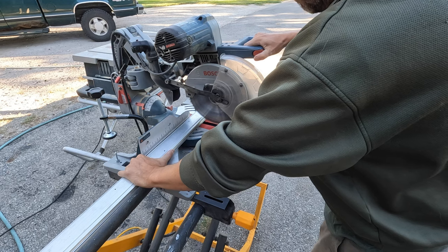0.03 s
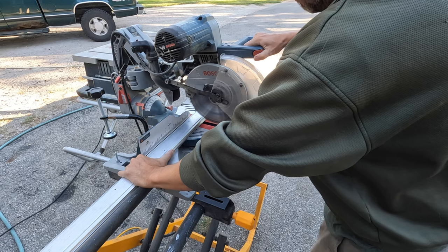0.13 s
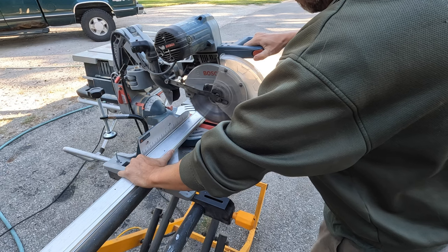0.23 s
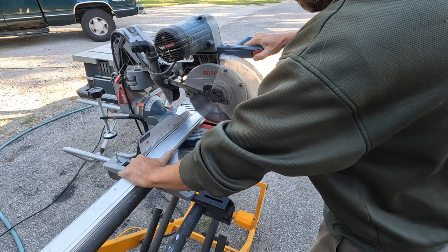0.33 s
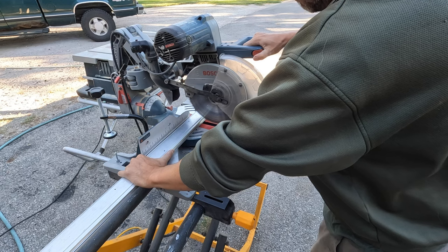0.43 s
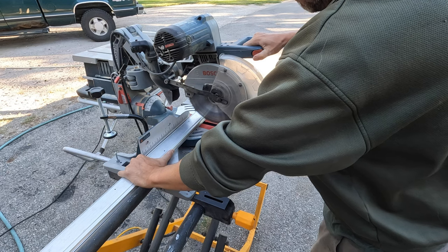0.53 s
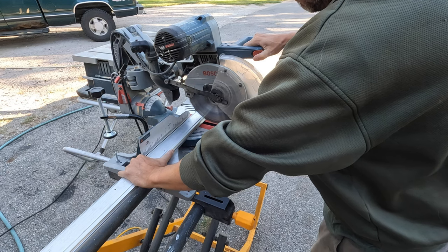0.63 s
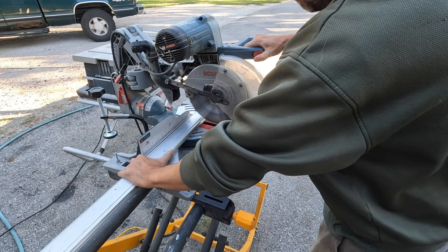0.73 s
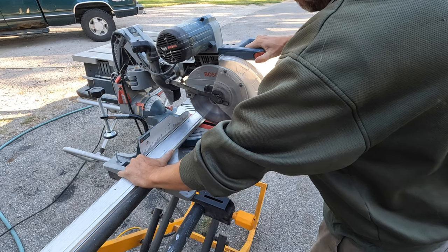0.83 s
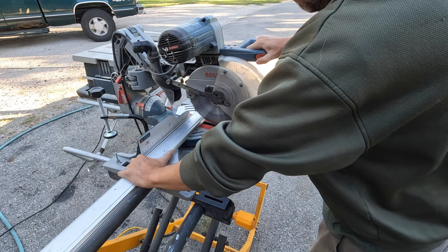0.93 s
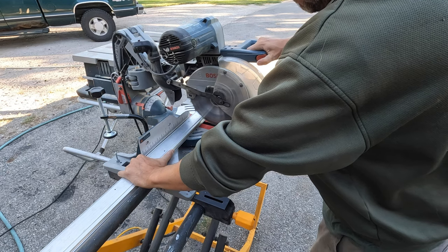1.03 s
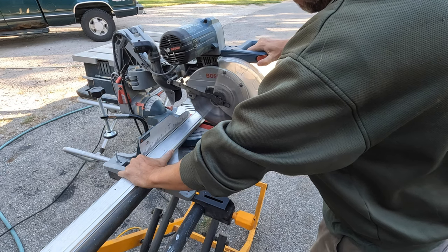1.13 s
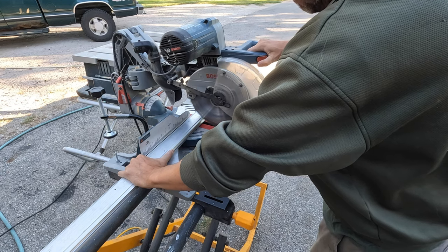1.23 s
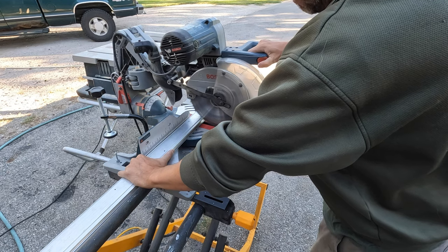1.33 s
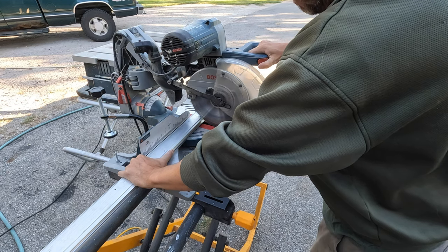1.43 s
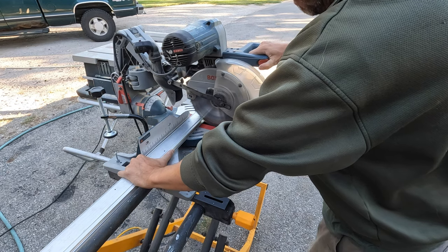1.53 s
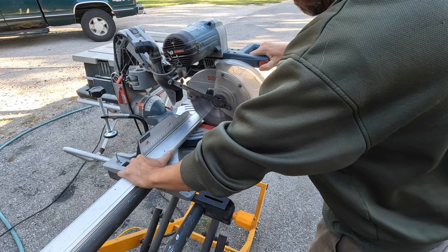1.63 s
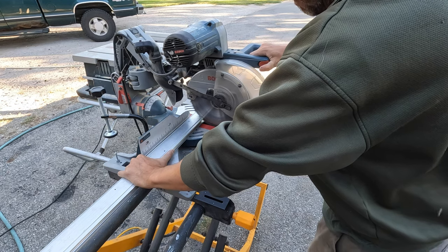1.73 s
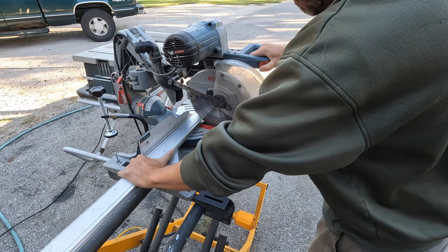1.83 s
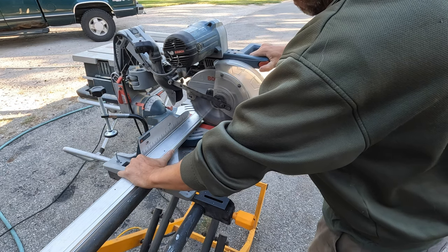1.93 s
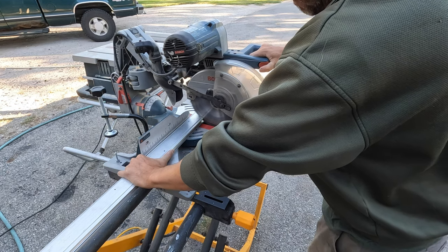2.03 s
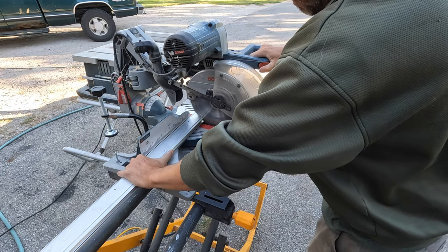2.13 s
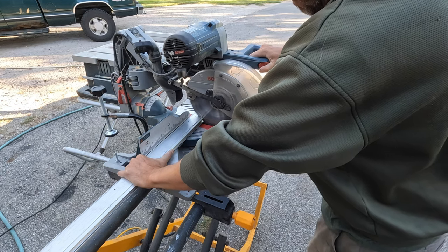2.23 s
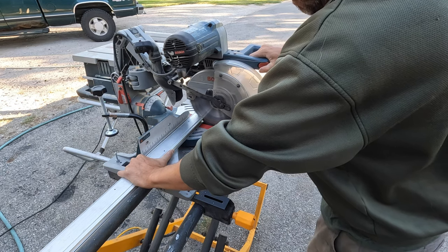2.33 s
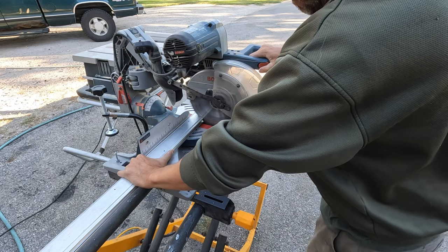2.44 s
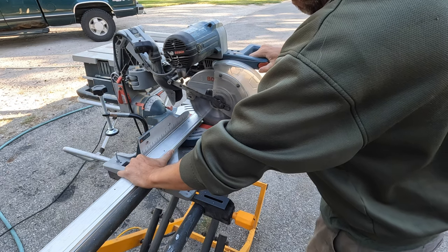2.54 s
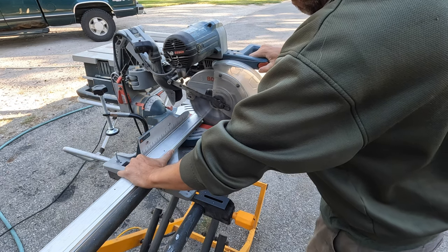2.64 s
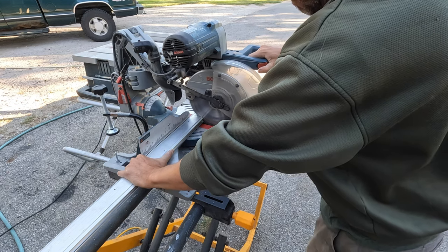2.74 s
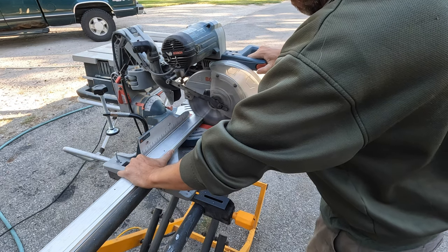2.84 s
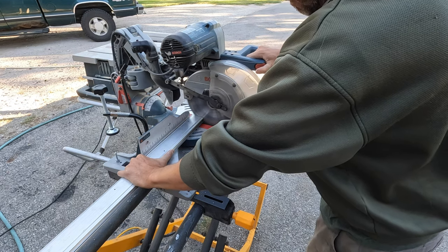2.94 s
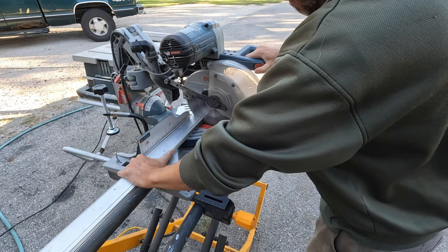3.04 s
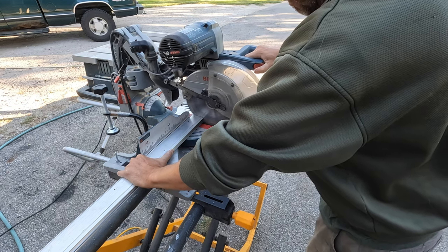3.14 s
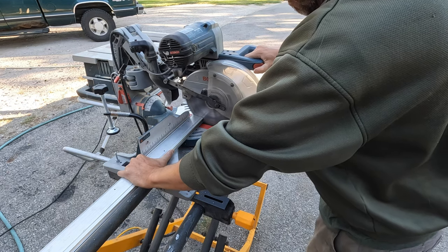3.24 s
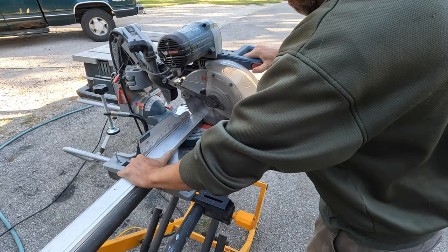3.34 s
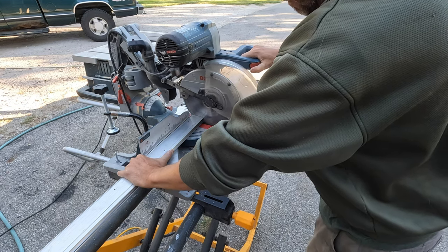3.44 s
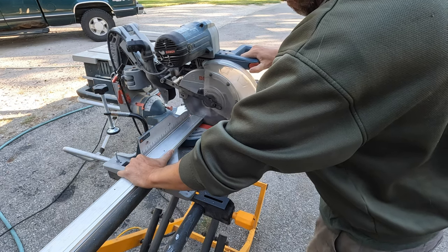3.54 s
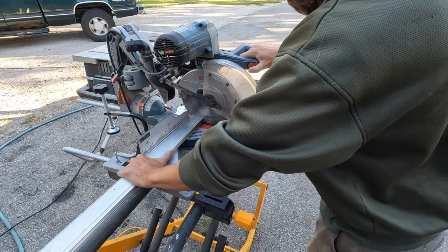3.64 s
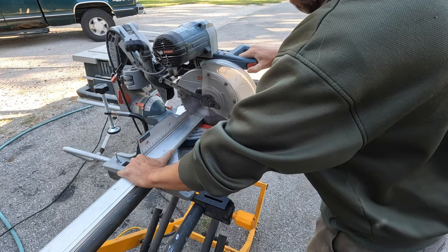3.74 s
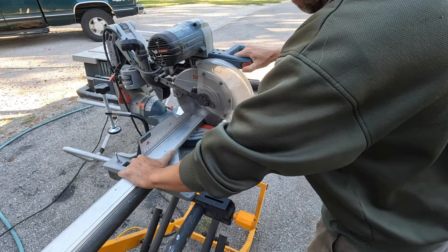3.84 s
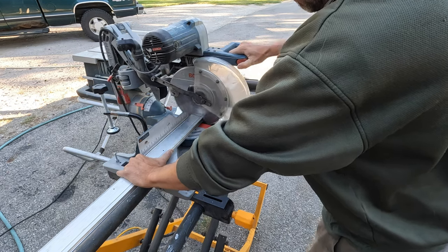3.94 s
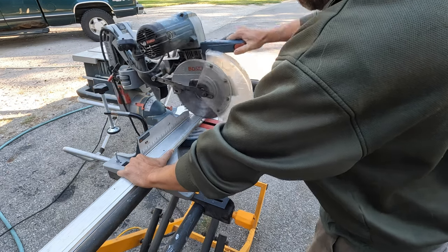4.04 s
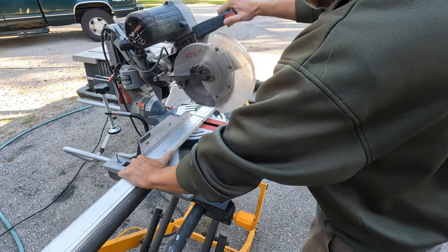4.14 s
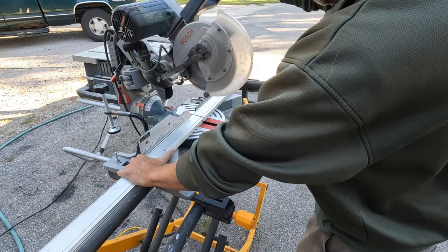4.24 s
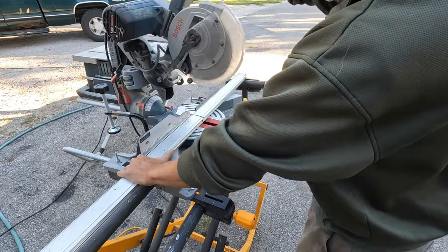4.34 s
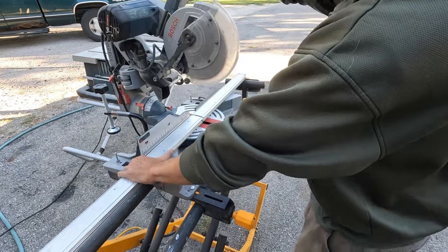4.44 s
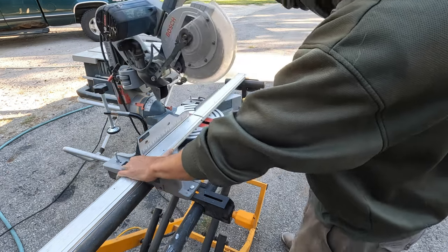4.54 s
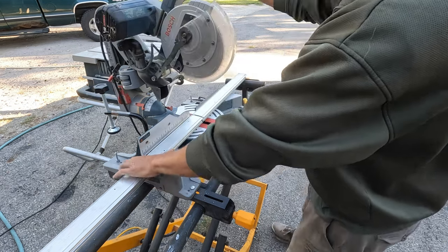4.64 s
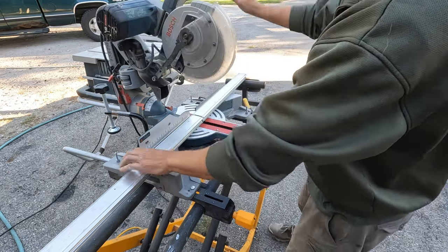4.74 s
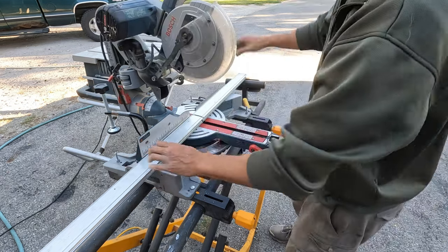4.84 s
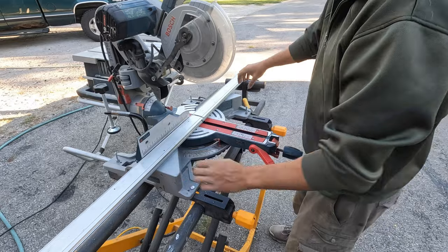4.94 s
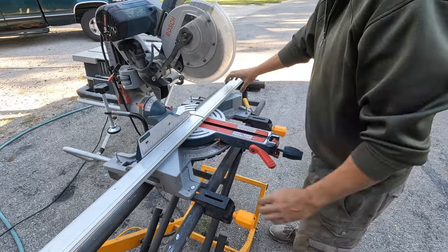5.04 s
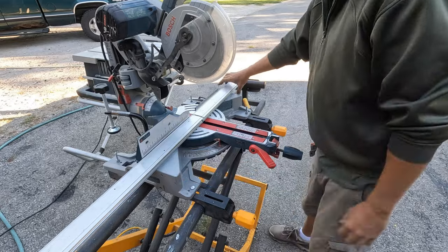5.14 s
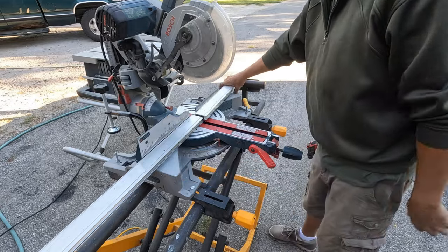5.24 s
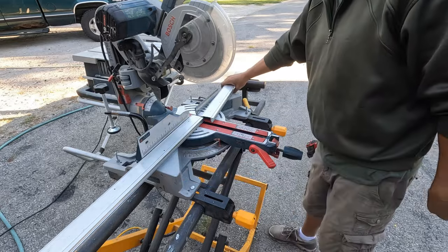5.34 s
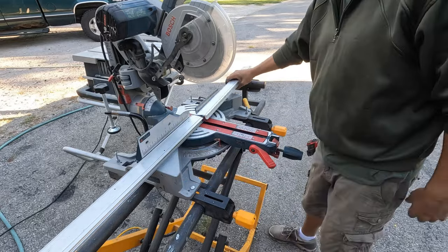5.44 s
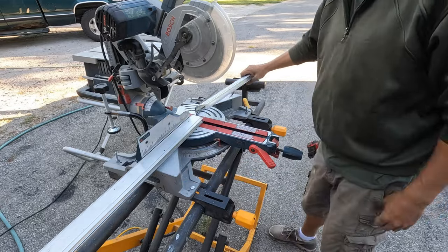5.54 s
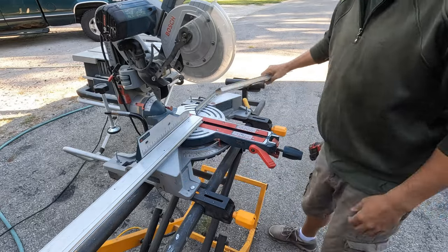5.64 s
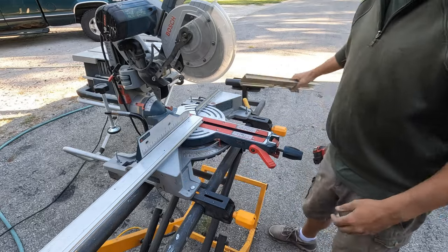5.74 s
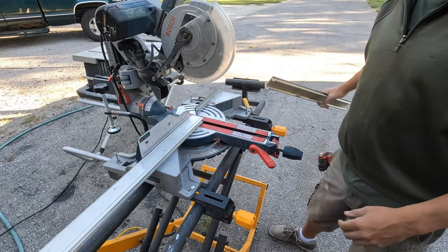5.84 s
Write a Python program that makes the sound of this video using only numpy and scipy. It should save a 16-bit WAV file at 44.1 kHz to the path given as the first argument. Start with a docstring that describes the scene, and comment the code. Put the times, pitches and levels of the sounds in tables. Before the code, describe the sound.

Harsh metallic sawing with shifting squeals stops abruptly, followed by a spinning blade whirring and whistling downward, and light knocks of an aluminium offcut.

```python
"""Mitre saw cutting aluminium

A saw cuts through an extrusion on a driveway: forced vibration makes the teeth hammer and whine, chips hiss,
and the tooth rate sags with the motor. The blade breaks through, is lifted and braked: narrow noise bands
whistle downwards in pitch while the modes of the steel disc sing on. The offcut, noise bursts exciting
resonances, clatters as it is picked up. Light breeze and puffs of air move the microphone.
A hard surface close by returns one echo, whose interference gives the noises a hollow colour."""
import sys
import numpy as np
from scipy import signal
from scipy.fft import rfft, irfft, next_fast_len
from scipy.io import wavfile

SR = 44100
rng = np.random.default_rng(int(sys.argv[2]) if len(sys.argv) > 2 else 0)


def inscribe(sig):
    """Save sig as 16-bit PCM at rate SR to the path in sys.argv[1].

    A 1-D sig is mono; a 2-D sig holds one channel per row.
    Samples are clipped to [-1, 1] before scaling.
    """
    pcm = np.round(np.clip(np.atleast_2d(sig).T, -1, 1) * 32767)
    wavfile.write(sys.argv[1], SR, pcm.astype(np.int16))


N = 259749
TIME = np.arange(N) / SR   # s
TOOTH_COUNT = 60


def from_db(db):
    """Logarithmic level: decibels to amplitude gain."""
    return 10 ** (np.asarray(db) / 20)


def rms_one(x):
    """Normalisation of mean power: scale to an rms of 1."""
    return x / np.sqrt(np.mean(x ** 2) + 1e-20)


def in_time(rows):
    """Linear interpolation: the columns of a curve table at every sample."""
    s, *columns = np.transpose(rows)
    return [np.interp(TIME, s, c) for c in columns]


def colour(x, points):
    """Spectral shaping: filter by an (f/Hz, gain/dB) outline, falling 20 dB per octave beyond its ends."""
    size = next_fast_len(N + 8192)
    hz, db = np.transpose(points)
    bins = np.maximum(np.arange(size // 2 + 1) * SR / size, 1)
    outline = np.interp(np.log(bins), np.log(hz), db)
    octaves_below = np.maximum(np.log2(hz[0] / bins), 0)
    octaves_above = np.maximum(np.log2(bins / hz[-1]), 0)
    gain = from_db(outline - 20 * (octaves_below + octaves_above))
    return irfft(rfft(x, size) * gain, size)[:N]


def drift(rate):
    """Low-pass random process: slow chance of rms 1, from two equal poles at rate Hz."""
    r = np.exp(-80 * np.pi * rate / SR)   # the process runs at SR / 40
    chance = rng.standard_normal(N // 40 + 2002)
    slow = signal.lfilter([1], [1, -2 * r, r * r], chance)[2000:]   # skip the settling
    return np.interp(np.arange(N) / 40, np.arange(len(slow)), rms_one(slow))


def noise(points):
    """Coloured Gaussian noise of rms 1."""
    return rms_one(colour(rng.standard_normal(N), points))


def resonance(x, hz, width):
    """Damped oscillator: a two-pole resonance with a gain of about 1 at its peak."""
    r = np.exp(-np.pi * width / SR)
    zeros = np.array([1, 0, -1]) * (1 - r * r) / 2
    poles = [1, -2 * r * np.cos(2 * np.pi * hz / SR), r * r]
    return signal.lfilter(zeros, poles, x + 1e-18)


def phase_of(hz):
    """Phase integration: running phase of a moving frequency."""
    return 2 * np.pi * np.cumsum(hz) / SR


def narrow_noise(hz, width):
    """Quadrature modulation: noise gathered around a moving pitch, rms about 0.71 (-3 dB)."""
    phase = phase_of(hz)
    return (drift(width) * np.cos(phase) + drift(width) * np.sin(phase)) / np.sqrt(2)


def swell(start, length, rise_s=0.023, fall_s=0.017):
    """Smooth envelope: a rise, hold and fall between 0 and 1."""
    rise = .5 + .5 * np.tanh((TIME - start) / (2 * rise_s))
    fall = .5 - .5 * np.tanh((TIME - start - length) / (2 * fall_s))
    return rise * fall


ECHO_DELAY_S = .003775


def near_echo(x, strength, dull_hz=9000):
    """Comb-filter interference: one reflection, weak in the top treble, hollows the spectrum."""
    size = next_fast_len(N + 8192)
    hz = np.arange(size // 2 + 1) * SR / size
    # 77% of the strength returns in the bass, 20% at the very top
    back = np.clip(strength, 0, .95) * (0.2 + 0.57 / (1 + (hz / dull_hz) ** 10))
    comb = (1 + back * np.exp(-2j * np.pi * hz * ECHO_DELAY_S)) / np.sqrt(1 + back ** 2)
    return irfft(rfft(x, size) * comb, size)[:N]


BREAK_S, BREAK_DB_PER_S = 3.718, 212   # the blade breaks through and the cut dies away
USUAL_LOAD_DB = -32.5
# how hard the teeth hammer the extrusion: t/s, load level/dB
CUTTING_LOAD = [(0.0, -33), (0.14, -29), (0.83, -31), (1.13, -36.5), (1.37, -36), (1.54, -41), (1.75, -34),
                (2.07, -38.5), (2.34, -32), (2.68, -32), (2.74, -37.5), (3.17, -31), (3.5, -36.5),
                (3.6, -31.5), (3.7, -33)]


def under_load(db, share):
    """Forcing sets response: a layer's gain follows a share of the load's swing and dies at the break."""
    load_db, = in_time(CUTTING_LOAD)
    broken_s = np.maximum(TIME - BREAK_S, 0)
    return from_db(db + share * (load_db - USUAL_LOAD_DB) - BREAK_DB_PER_S * broken_s)


def tooth_bites(rate, memory):
    """Near-periodic forcing: unlike teeth partly repeat each turn; the pattern changes as the kerf deepens."""
    turns = np.cumsum(rate / TOOTH_COUNT) / SR
    steps, orders = 32 * TOOTH_COUNT, 5 * TOOTH_COUNT   # per turn: points, harmonics
    fresh = rng.standard_normal((int(turns[-1]) + 2, orders, 2)) @ [1, 1j]
    strengths = signal.lfilter([1], [1, -memory], fresh, axis=0)   # each turn remembers the last
    pattern = irfft(strengths, steps, axis=1).ravel()
    wobble = 1 + 0.041 * np.sin(2 * np.pi * turns + drift(1.0))   # the blade runs slightly out of true
    return wobble * rms_one(np.interp(turns * steps, np.arange(len(pattern)), pattern))


# layers of the cut: (level at the usual load/dB, share of the load's swing that is followed)
RASP_LEVEL, WALLS_LEVEL, CHIPS_LEVEL = (-32, 0.68), (-34, 0.98), (-33, -0.1)
# spectral outlines of kerf, extrusion walls, flying chips and table: f/Hz, relative level/dB
RASP_COLOUR = [(2700, -55), (3400, 3), (3900, 6), (4500, 6), (5200, 5.5), (5800, 3), (6400, -1.5),
               (7200, -9), (8200, -12), (9500, -39)]
WALLS_COLOUR = [(330, -11), (500, -7), (680, -9), (850, 1.5), (1050, 3), (1350, 0.5), (1600, 1.5),
                (1900, -1.5), (2400, 0), (3200, 1.5), (4200, -6.5)]
CHIPS_COLOUR = [(6500, 2), (8600, 0.5), (10000, -2), (11700, 1), (13000, 0), (15000, 1.5), (16500, -6)]
RUMBLE_COLOUR = [(20, 1), (38, -13), (65, 10), (100, -3.5), (150, 0), (230, -0.5), (310, -3), (450, -8),
                 (700, -6)]
# rumble of the table: t/s, relative level/dB
TABLE_RUMBLE = [(0.0, -57), (0.08, -50.5), (2.13, -45), (2.28, -50.5), (2.49, -45), (2.95, -55.5),
                (3.71, -43.5)]


def cutting(rate):
    """Forced vibration: the bites shake the kerf, the extrusion walls and the table; chips spray off."""
    grab = from_db(0.82 * drift(39))   # the feed grabs and slips
    rasp = under_load(*RASP_LEVEL) * rms_one(colour(tooth_bites(rate, memory=0.76), RASP_COLOUR))
    walls = under_load(*WALLS_LEVEL) * rms_one(colour(tooth_bites(rate, memory=0.61), WALLS_COLOUR))
    chips = under_load(*CHIPS_LEVEL) * rms_one(colour(tooth_bites(rate, memory=0.4), CHIPS_COLOUR))
    chips = chips * from_db(0.57 * drift(120))
    rumble = under_load(in_time(TABLE_RUMBLE)[0] + 1, 0) * noise(RUMBLE_COLOUR)
    return grab * (rasp + walls + chips) + rumble


# steady whine of the teeth: level/dB of harmonics 1 to 4
STEADY_WHINE = [-46.5, -49, -56.5, -55]
# squeals, a wall shaking in step with the teeth: start t/s, length/s, harmonic of the tooth rate, level/dB
WALL_SQUEALS = [(0.52, 0.091, 1, -33), (.68, 0.22, 1, -33), (1.0, 0.22, 1, -35), (1.2, 0.82, 4, -48),
                (2.15, 0.35, 3, -43), (.74, 0.58, 3, -39), (1.045, 0.29, 2, -35), (1.317, 0.22, 1, -27),
                (1.5, 0.16, 2, -25), (1.48, 0.14, 3, -33), (1.565, 0.7, 1, -32), (1.79, 0.28, 2, -26.5),
                (1.948, 0.19, 1, -27), (2.7, 0.064, 2, -29.5), (2.815, 0.14, 3, -39.5),
                (3.25, 0.39, 3, -36.5), (3.33, 0.075, 1, -24), (3.445, 0.048, 2, -21),
                (3.45, 0.12, 4, -40.5), (3.66, 0.072, 1, -19)]


def whine_levels():
    """Superposed envelopes: each harmonic has a steady gain, and squeals that swell and fade on top."""
    levels = [np.full(N, from_db(db)) for db in STEADY_WHINE]
    for start, length, harmonic, db in WALL_SQUEALS:
        levels[round(harmonic) - 1] += from_db(db) * swell(start, length)
    return levels


def whine(rate, jitter_hz=1.5, shimmer_db=1.3, faltering_db=2.5, firm_db=-38):
    """Harmonic series of the tooth rate: it flares up in the squeals, and falters where it is weak."""
    phase = phase_of(rate + jitter_hz * drift(35))
    harmonics = 0
    for k, gain in enumerate(whine_levels(), 1):
        weak = 1 / (1 + (gain / from_db(firm_db)) ** 2)
        unsteady = from_db(shimmer_db * drift(55) + faltering_db * weak * drift(19))
        harmonics = harmonics + gain * unsteady * np.sqrt(2) * np.sin(k * phase)
    flutter = 1 + .12 * np.sin(phase / TOOTH_COUNT)   # once per turn
    return harmonics * flutter


# modes of extrusion and clamped blade that ring under the teeth: f/Hz, width/Hz, relative level/dB
CLAMPED_MODES = [(1030, 110, -23), (1585, 35, -18), (2136, 45, -21), (2392, 35, -17), (3750, 14, -13),
                 (3976, 24, -13), (4232, 18, -17), (4520, 40, -12), (4790, 60, -12), (5060, 40, -11),
                 (5345, 45, -9), (6350, 50, -12)]
# chatter locked to the blade's turning: start t/s, end t/s, cycles per turn, relative level/dB
CHATTER_TONES = [(0, .7, 30, -46), (0, .9, 14, -44), (0, .6, 7, -52), (0, 1, 22, -44), (0, .6, 33, -45),
                 (.7, 1.65, 42, -46), (.75, 1.65, 8, -52), (.8, 1.15, 73, -41), (.85, 1.65, 68, -42),
                 (1.12, 1.5, 24, -48), (1.24, 1.4, 79, -35), (1.6, 2.35, 77, -40), (2.2, 2.8, 29, -47),
                 (2.25, 2.75, 33, -44), (2.25, 2.72, 25, -44), (2.25, 2.72, 42, -42), (2.28, 2.68, 78, -36),
                 (2.4, 2.72, 82, -34), (2.62, 3.3, 90, -41), (2.72, 3.02, 26, -44), (2.95, 3.45, 46, -45),
                 (3, 3.35, 12, -46), (3.04, 3.25, 70, -38), (3.38, 3.6, 78, -38), (3.4, 3.77, 42, -40),
                 (3.53, 3.77, 25, -37)]


def ringing_metal(rate, in_metal, rough_hz=22, modes_db=-0.5, chatter_db=3.0, wander_db=3.5):
    """Modal resonance: fixed modes swell, fade and ring out, while chatter tones follow the motor's speed."""
    bites = rms_one(tooth_bites(rate, memory=0.2)) * in_metal
    bites = bites * under_load(*RASP_LEVEL) * from_db(modes_db)
    out = np.zeros(N)
    for hz, width, db in CLAMPED_MODES:
        drive = bites * from_db(wander_db * drift(3.9))
        # the divisor offsets the small share of the noise that a narrow mode passes
        out += from_db(db) * resonance(drive, hz, width) / np.sqrt(np.pi * width / SR)
    turn, unrest = phase_of(rate / TOOTH_COUNT), drift(rough_hz)
    for start, end, cycles, db in CHATTER_TONES:
        span = slice(int(start * SR), int(end * SR))
        envelope = np.clip(np.minimum(TIME[span] - start, end - TIME[span]) / 0.064, 0, 1)
        grip, slip = (np.roll(unrest, shift)[span] for shift in rng.integers(0, N, size=2))
        tone = np.sin(cycles * turn[span] + cycles / TOOTH_COUNT * 0.48 * slip)
        out[span] += from_db(db + chatter_db) * envelope * (0.95 + 0.21 * grip) * tone
    return out


# the mode driven by the last squeal rings on after the break
RING_OUT_HZ, RING_OUT_DB, RING_OUT_DB_PER_S = 3732, -32.5, 110
# blade modes that sing in the kerf: start t/s, length/s, f/Hz, relative level/dB, roughness (0-1)
KERF_SONGS = [(0, 1.0, 3985, -37.5, .6), (1.0, .3, 3975, -41.5, .5), (1.3, .48, 3962, -36.5, .12),
              (1.78, .7, 3970, -39, .25), (2.5, .45, 3990, -43, .7), (3.3, .13, 3970, -32, .2),
              (0, .7, 2375, -44, .6), (1.15, .45, 2385, -45, .5), (2.9, .8, 2398, -42, .6),
              (0, .9, 1590, -46, .6), (2.95, .3, 1610, -45, .5), (1.6, 1.1, 5085, -42, .6),
              (3.4, .14, 5040, -38, .5), (1.6, .6, 5320, -44, .6), (2.35, .37, 5300, -40.5, .6),
              (2.27, .43, 2705, -46, .6), (3.92, .33, 4570, -48, .8), (4.0, .36, 4740, -47, .9)]


def blade_song(level_db=-0.1, spread_hz=16):
    """Modes and beats: single modes sing, those near the tooth rate beat with the whine, and one rings out."""
    out = 0
    for start, length, hz, db, rough in KERF_SONGS:
        pure_tone = np.sqrt(2 * (1 - rough ** 2)) * np.sin(2 * np.pi * hz * TIME)
        tone = pure_tone + rough * narrow_noise(np.full(N, hz), spread_hz)
        out = out + from_db(level_db + db) * swell(start, length) * tone
    decay = from_db(RING_OUT_DB - RING_OUT_DB_PER_S * np.maximum(TIME - BREAK_S, 0))
    ring_out = swell(BREAK_S, 1) * decay * np.sqrt(2) * np.sin(2 * np.pi * RING_OUT_HZ * TIME)
    return out + ring_out


# the blade is lifted clear of the kerf; its noise swells as it passes the fence
LIFT_S, LIFT_LENGTH_S = 4.12, 0.21
STALL_SPEED = 0.11   # share of full speed around which the free blade's noises begin to vanish


def at_speed(speed, db, slowing_db, kerf_db):
    """Speed law of radiated noise: screened until the lift, with a level that depends on the speed."""
    in_kerf = .5 - .5 * np.tanh((TIME - LIFT_S) / LIFT_LENGTH_S)
    level_db = db + slowing_db * np.log10(speed + 1e-6) - kerf_db * in_kerf
    return from_db(level_db) * speed / np.hypot(speed, STALL_SPEED)


# (level near full speed/dB, loss per tenfold drop of speed/dB, loss in the kerf/dB)
WHIRR_LEVEL, HISS_LEVEL = (-46.5, -3.8, 4), (-44.5, 6.2, 0.33)
# spectral outlines of the gears and the fan: f/Hz, relative level/dB
WHIRR_COLOUR = [(110, -13), (230, -11.5), (380, -7), (520, 0), (680, 1), (860, 1), (1250, 1.5), (1800, 0.5),
                (2400, -1), (3200, -14), (4500, -48)]
HISS_COLOUR = [(1500, -30), (2800, 5), (3500, 3.5), (4400, -5.5), (5200, 2.5), (5900, -5.5), (6700, -9.5),
               (8000, -12.5), (10000, -17.5), (12000, -18.5), (14000, -19), (16000, -33)]


def running_out(speed, whirr_swell_db=4.5, hiss_swell_db=6.5):
    """Broadband machine noise: gears whirr and the fan hisses, vanishing as the blade stops."""
    lifting = np.exp(-((TIME - LIFT_S) / LIFT_LENGTH_S) ** 2)
    whirr = at_speed(speed, *WHIRR_LEVEL) * from_db(whirr_swell_db * lifting) * noise(WHIRR_COLOUR)
    hiss = at_speed(speed, *HISS_LEVEL) * from_db(hiss_swell_db * lifting) * noise(HISS_COLOUR)
    return whirr + hiss


WHISTLE_LEVEL = (-42.5, 14, 7)   # relative level/dB, loss per tenfold drop of speed/dB, loss in the kerf/dB
WHISTLE_WIDTH_HZ = 34
# air whistles: f at full speed/Hz, relative level/dB, strongest share of full speed, spread of that share
AIR_WHISTLES = [(2030, -3, .8, .35), (2230, -1, .5, .6), (2470, -.5, .6, .6), (2740, -1, .7, .3),
                (3780, 3.5, .42, .08)]
# radiation of the eddies, weak in the treble: f/Hz, gain/dB
EDDY_RADIATION = [(300, -6), (550, 1), (850, 2.5), (1200, -2.5), (1800, 0.5), (2300, 0.5), (2800, -2)]


def whistles(speed):
    """Vortex shedding: eddies behind teeth and slots whistle in strands that sink together with the speed."""
    out = 0
    for hz, db, best, span in AIR_WHISTLES:
        wavering = np.sin(phase_of(hz * speed + WHISTLE_WIDTH_HZ * drift(30)))
        strand = wavering + narrow_noise(hz * speed, WHISTLE_WIDTH_HZ) / np.sqrt(2)
        out = out + from_db(db) * np.exp(-((speed - best) / span) ** 2 / 2) * strand
    shedding = np.clip((speed - .16) / .06, 0, 1)
    return shedding * at_speed(speed, *WHISTLE_LEVEL) * colour(out, EDDY_RADIATION)


# blade modes; spinning splits them into forward and backward waves:
# f at rest/Hz, shift at full speed/Hz, relative level at rest/dB, relative level at full speed/dB
DISC_MODES = [(226, 0, -63, -90), (853, -60, -56, -72), (866, 0, -53, -72), (1626, -50, -61, -66),
              (1750, 40, -62, -80), (1793, 40, -55, -61), (2073, 20, -61, -76), (2110, 0, -62, -74),
              (2340, 0, -88, -51), (2382, 0, -71, -47.5), (2643, -250, -53, -60), (2695, 0, -55, -68),
              (3018, 161, -50, -58), (3015, -115, -63, -54), (3289, 0, -67, -80), (3332, 100, -65, -65),
              (3718, 0, -88, -56), (4245, 0, -95, -58), (4565, 0, -92, -57), (4735, 0, -92, -58)]


def blade_ring(speed, waver=0.086, spread_hz=20.0, throb=0.61, lobes_hz=330, level_db=5.0,
               steady=0.49, rough_share=0.65):
    """Split modes of a spinning disc: rough at speed, purer as it slows and the pairs draw together."""
    out = 0
    turning = np.clip((speed - .032) / .012, 0, 1)
    for hz, shift_hz, rest_db, full_db in DISC_MODES:
        pitch = hz + shift_hz * speed * np.sqrt(speed)
        # the lobes of a mode sweep past the listener ever more slowly
        lobes = np.sin(phase_of(lobes_hz * speed * rng.uniform(0.65, 1.3)))
        sweep = 1 + throb * (1 - speed) ** 2 * lobes
        pure = (1.08 * (1 - speed) + 2.4 * steady * speed) * sweep * np.sin(phase_of(pitch))
        rough = (rough_share * speed + waver * (1 - speed)) * narrow_noise(pitch, spread_hz)
        fed = 1 - (1 - turning) / (1 + (hz / 1200) ** 6)   # the low modes die first as the blade stops
        gain = from_db(level_db + rest_db + (full_db - rest_db) * speed)
        out = out + fed * gain * (pure + rough)
    return out


# puffs of blade air that thump the microphone: t/s, level before the vent/dB, length/s
AIR_PUFFS = [(1.54, -25, 0.075), (1.97, -22.5, 0.053), (3.712, -13.5, 0.02)]
# breeze on the microphone: t/s, level/dB
BREEZE_LEVEL = [(0, -54.5), (3.8, -70), (4.5, -64), (5.1, -48), (5.89, -41.5)]
# spectral outline of the breeze: f/Hz, relative level/dB
BREEZE_OUTLINE = [(20, 21), (45, -20), (70, -3.5), (115, -15), (160, -25.5), (230, -19), (400, -38)]


def air_on_microphone(leak_hz=0.55):
    """Pressure relaxation: breeze rumbles; puffs push the diaphragm, which creeps back through its vent."""
    pushes = -sum(from_db(db) / (1 + ((TIME - s) / length) ** 2) ** 2 for s, db, length in AIR_PUFFS)
    thumps = signal.sosfilt(signal.butter(1, leak_hz, "high", fs=SR, output="sos"), pushes)
    return thumps + from_db(in_time(BREEZE_LEVEL)[0]) * noise(BREEZE_OUTLINE)


# shudders of the stand while the blade chatters: start t/s, length/s, level/dB
STAND_SHUDDERS = [(1.385, 0.15, -38), (1.6, 0.69, -46), (3.323, 0.18, -45.5)]
# spectral outline of the shaking stand: f/Hz, relative level/dB
STAND_COLOUR = [(20, 6), (38, 11.5), (50, -15), (65, 11), (85, -12), (130, -10), (300, -56)]


def shaking_stand():
    """Structure-borne vibration: low noise swells in each shudder of the stand."""
    envelope = sum(from_db(db) * swell(start, length) for start, length, db in STAND_SHUDDERS)
    return envelope * noise(STAND_COLOUR)


# knocks of saw arm and offcut: t/s, level/dB, centre f/Hz, t60/s, share of aluminium ring, share of crack
ARM_AND_OFFCUT_KNOCKS = [(4.363, -35, 580, 0.18, 0.22, 0.25), (5.203, -28.5, 1450, 0.065, 0.44, 1),
                         (5.205, -26, 1080, 0.042, 0.36, 1), (5.221, -35, 940, 0.16, 0.55, .3),
                         (5.278, -32.5, 1880, 0.09, 0.4, 0.49), (5.307, -34, 1250, 0.062, 0.63, 0.2),
                         (5.314, -37, 1210, 0.24, 0.79, 0.19), (5.458, -42.5, 2980, 0.098, 0.35, .5)]
# modes of the offcut: f/Hz, width/Hz, relative level/dB
OFFCUT_MODES = [(837, 20, 4), (1044, 30, 6), (1350, 60, 2), (1502, 26, 5.5), (1600, 40, 4), (2390, 50, -6),
                (3004, 60, -8), (4030, 60, -10), (5050, 35, -3)]


def knocks(crack_db=1, ring_db=17, dull_hz=11000):
    """Impact excitation: decaying noise, a rattle of contacts, drives a dull body, a crack and offcut modes."""
    bodies, strikes, cracks = 0, 0, 0
    for s, db, hz, t60, ring, crack in ARM_AND_OFFCUT_KNOCKS:
        age = np.maximum(TIME - s, 0)
        decay = from_db(db - 60 * age / t60) * (1 - np.exp(-age / 0.00064))
        contacts = rng.standard_normal(N)
        body = resonance(resonance(contacts, hz, hz * 0.33), hz, hz * 2.0)
        bodies = bodies + decay * rms_one(body)
        strikes = strikes + ring * decay * rng.standard_normal(N)
        cracks = cracks + crack * decay * rng.standard_normal(N)
    modes = sum(from_db(db) * resonance(strikes, hz, width) for hz, width, db in OFFCUT_MODES)
    struck = bodies + from_db(crack_db) * resonance(cracks, 3400, 1600) + from_db(ring_db) * modes
    return signal.sosfilt(signal.butter(2, dull_hz, fs=SR, output="sos"), struck)


# the motor sags under load, recovering a little in the middle of the profile: t/s, tooth rate f/Hz
MOTOR_TOOTH_RATE = [(0.0, 4314), (0.2, 4300), (0.78, 4197), (1.2, 4095), (1.55, 4008), (1.96, 3979),
                    (2.29, 3915), (2.58, 3873), (2.84, 3816), (3.08, 3880), (3.35, 3914), (3.58, 3808),
                    (3.67, 3750), (3.74, 3721)]
# the free blade, braked after the lift: t/s, share of full speed
BLADE_SPEED = [(0, 0.97), (4.24, 0.97), (4.4, 0.78), (4.5, 0.655), (4.6, 0.545), (4.72, 0.45), (4.87, 0.35),
               (5.0, .268), (5.15, 0.205), (5.45, .09), (5.9, 0.021)]
# faint side signal: f/Hz, level re mid/dB
SIDE_LEVEL = [(60, -40), (110, -10.5), (200, -26.5), (380, -19.5), (700, -30), (1290, -40), (2380, -38),
              (4400, -37.5), (8120, -34), (15000, -39)]


def scene():
    """Superposition: saw and offcut straight ahead, nearly mono, with a faint delayed side signal."""
    rate, = in_time(MOTOR_TOOTH_RATE)
    speed = np.clip(in_time(BLADE_SPEED)[0], 0, 1)
    in_metal = np.interp(TIME, [3.74, 3.82], [1, 0])
    free = np.interp(TIME, [3.6, 3.76], [.3, 1])
    noises = near_echo(in_metal * cutting(rate) + knocks(), strength=0.66)
    noises = noises + near_echo(free * running_out(speed), strength=0.75)
    noises = noises + near_echo(free * whistles(speed), strength=0.68)
    tones = in_metal * (whine(rate) + shaking_stand()) + blade_song()
    tones = tones + ringing_metal(rate, in_metal) + free * blade_ring(speed)
    mid = noises + tones + air_on_microphone()
    side = colour(np.concatenate([np.zeros(300), mid[:-300]]), SIDE_LEVEL)   # 300 samples late
    return np.array([mid + side, mid - side])


def record(dry, cutoff_hz=16500):
    """Band limiting: a steep zero-phase low-pass cuts the top."""
    return signal.sosfiltfilt(signal.ellip(10, .1, 60, cutoff_hz, fs=SR, output="sos"), dry)


dry = scene()
out = record(dry)
inscribe(out)
```